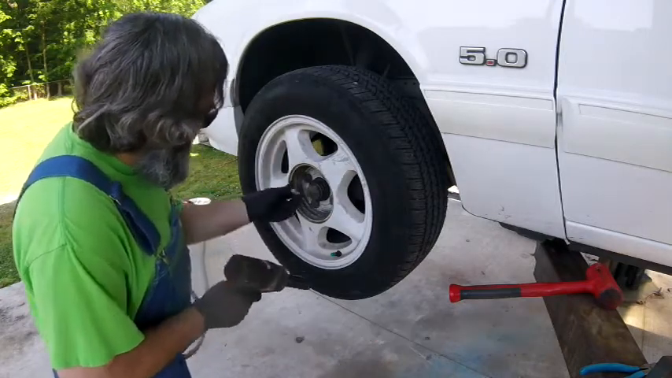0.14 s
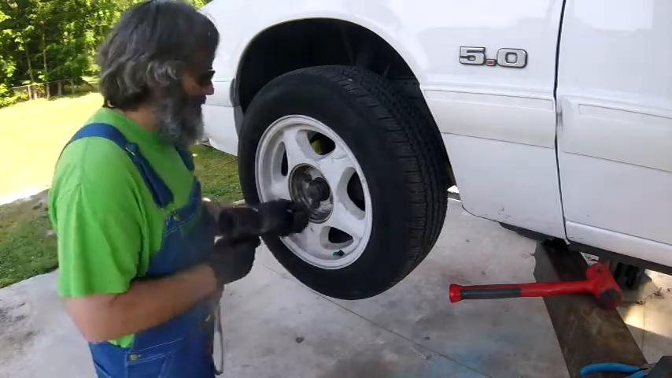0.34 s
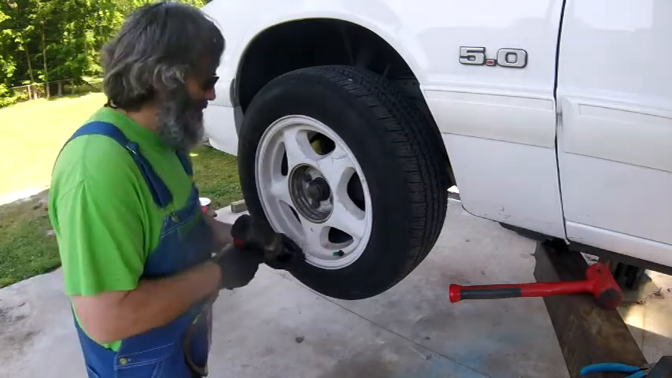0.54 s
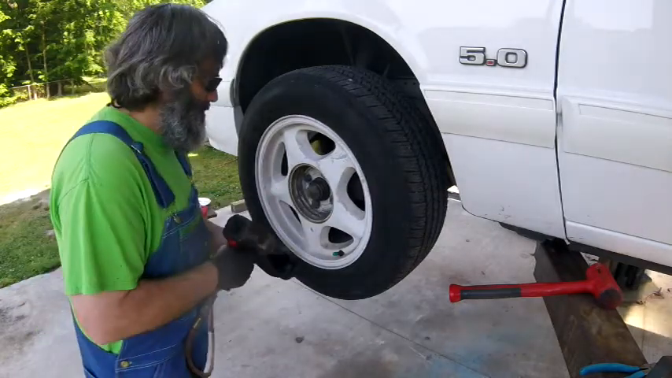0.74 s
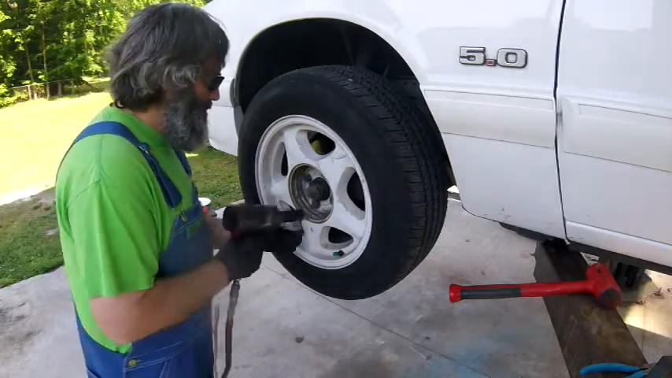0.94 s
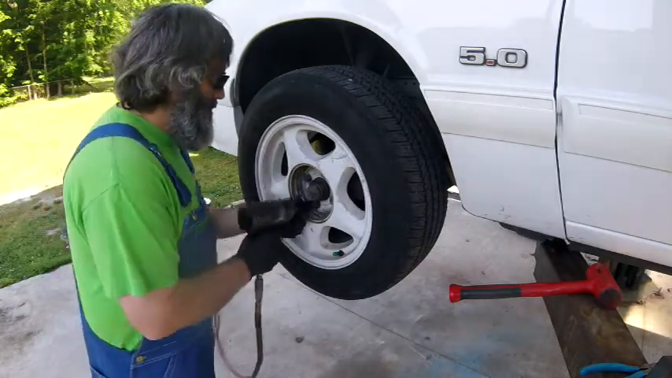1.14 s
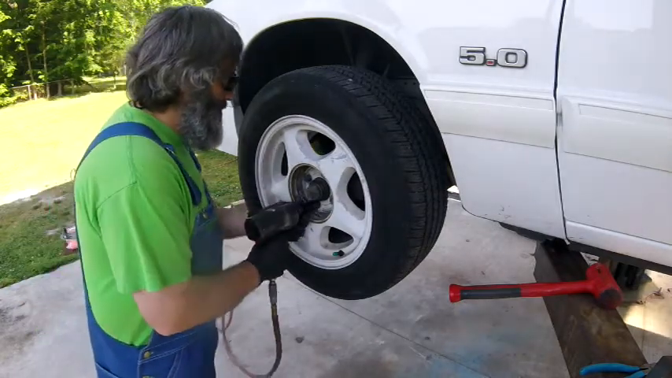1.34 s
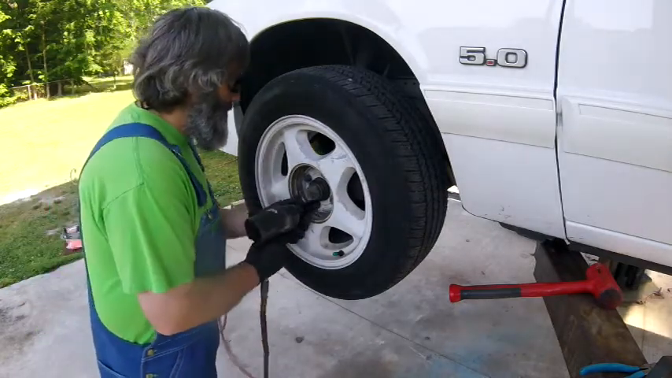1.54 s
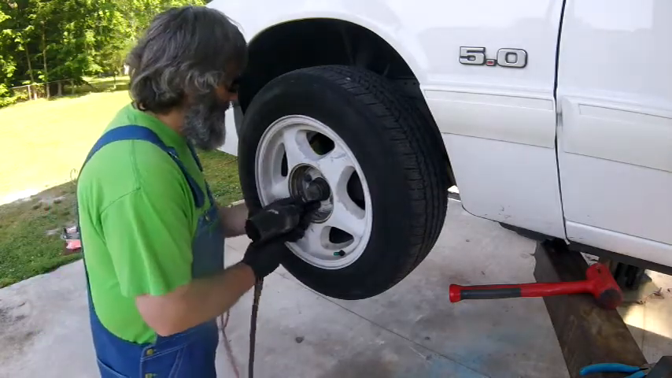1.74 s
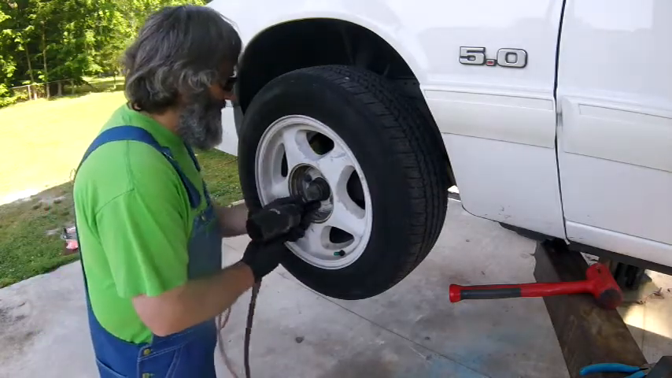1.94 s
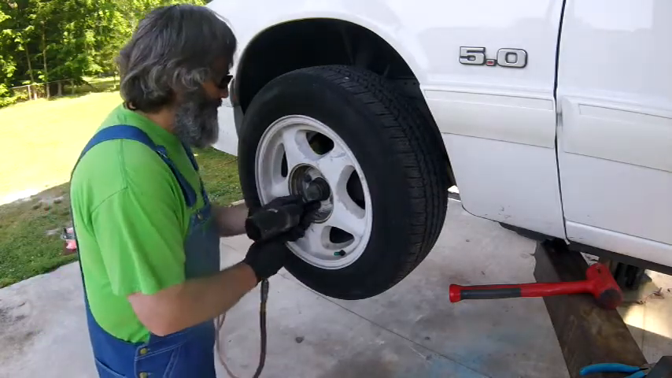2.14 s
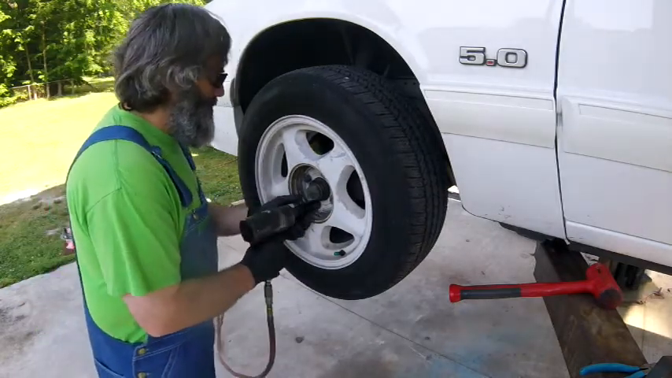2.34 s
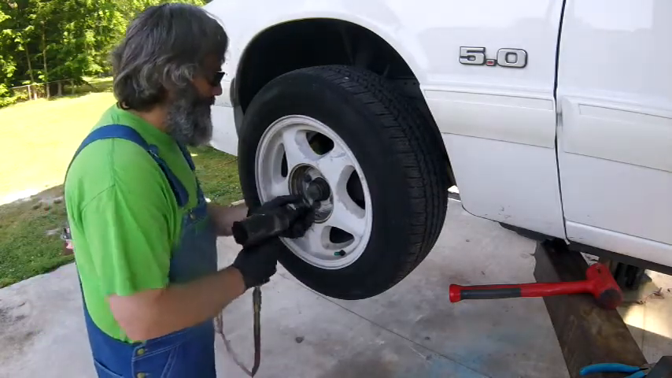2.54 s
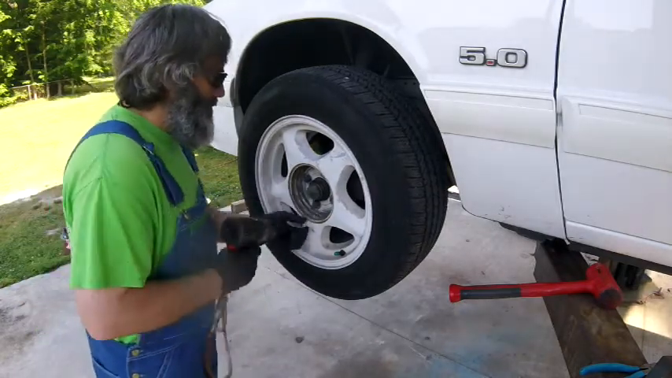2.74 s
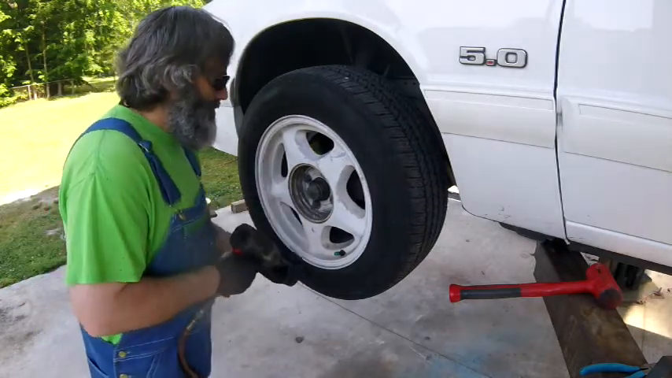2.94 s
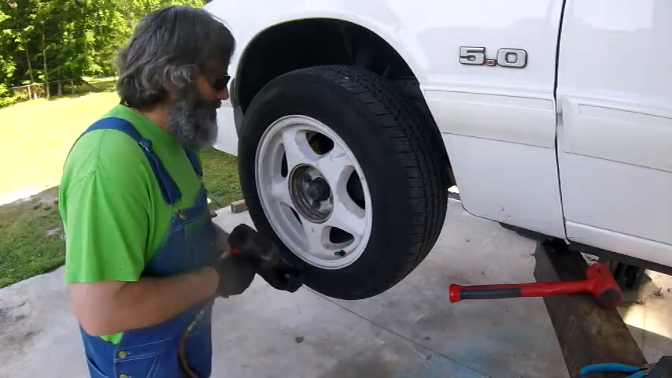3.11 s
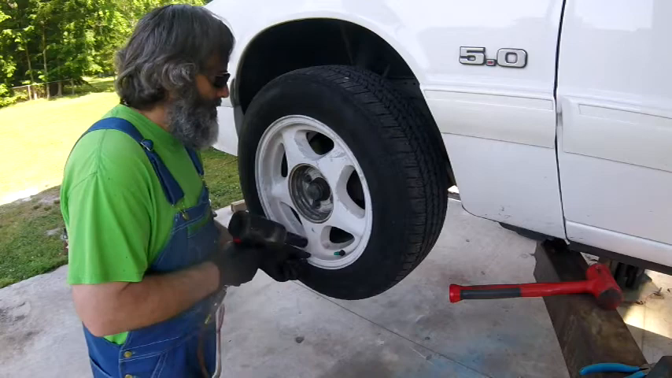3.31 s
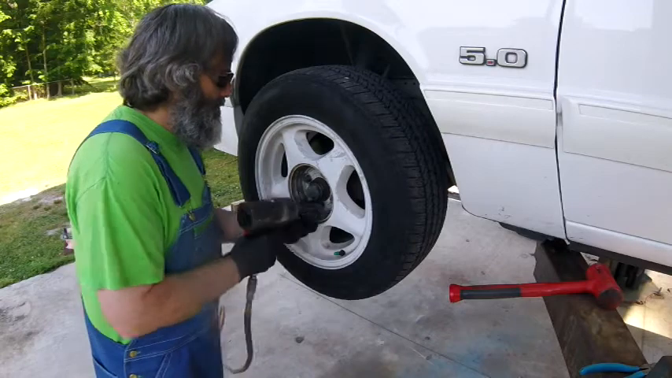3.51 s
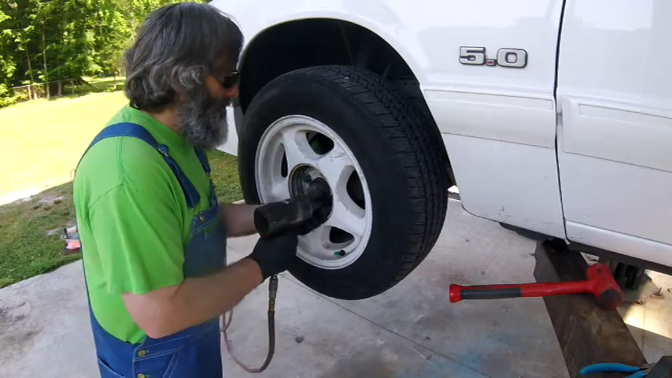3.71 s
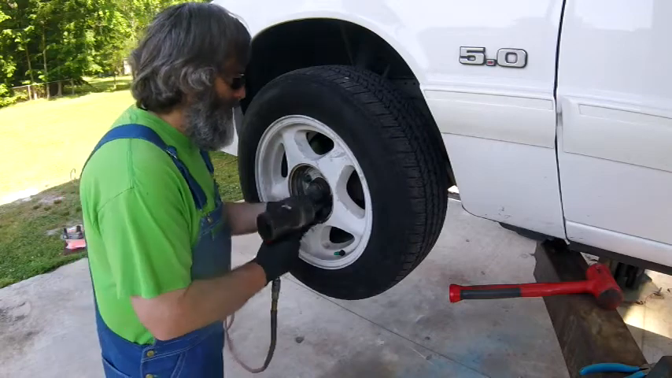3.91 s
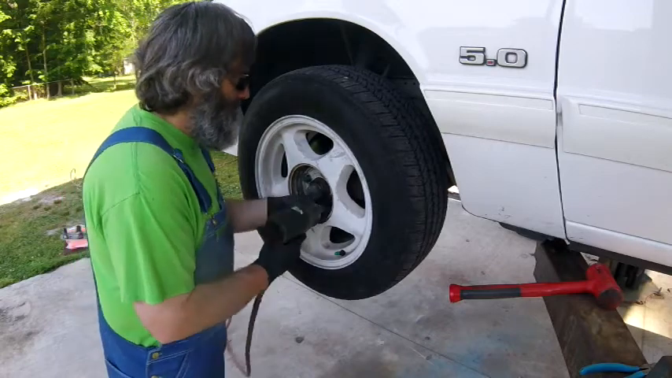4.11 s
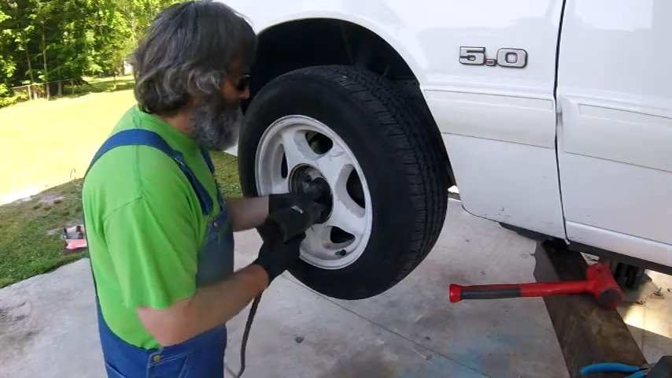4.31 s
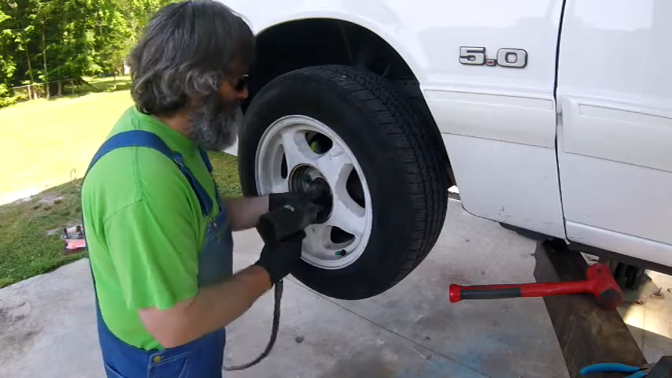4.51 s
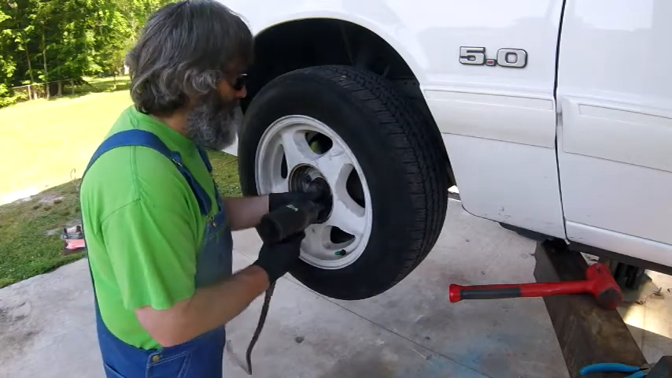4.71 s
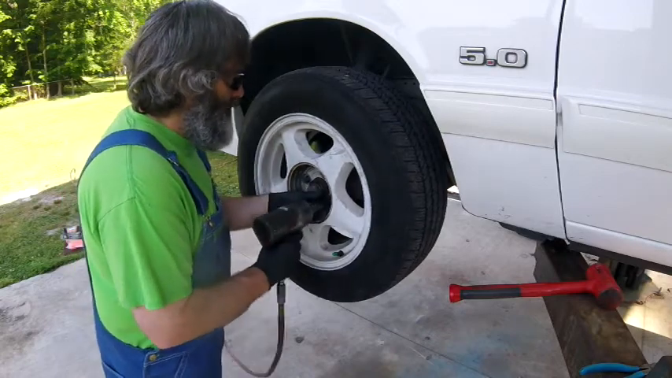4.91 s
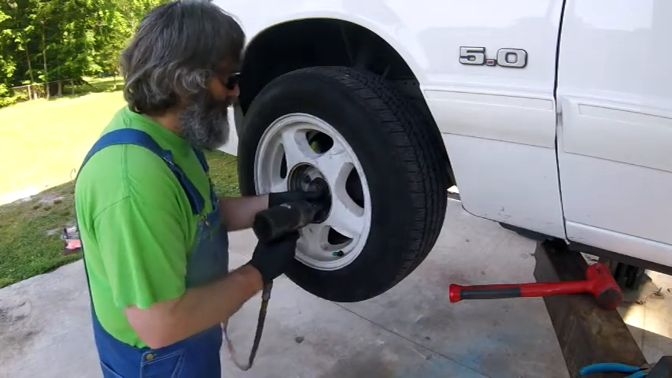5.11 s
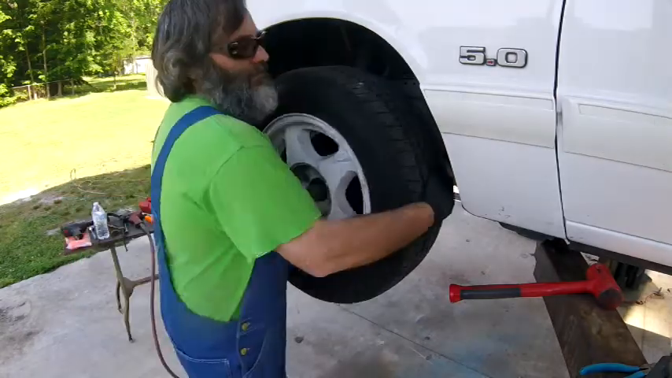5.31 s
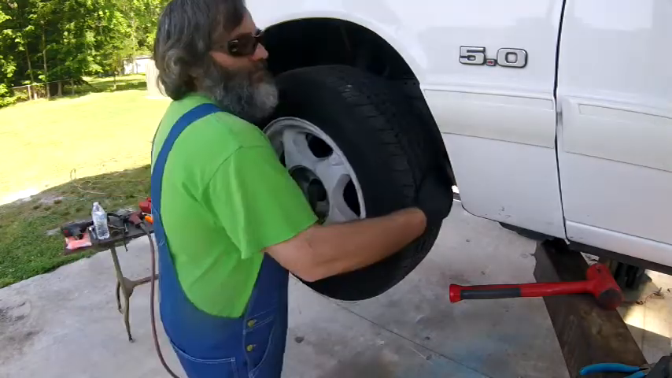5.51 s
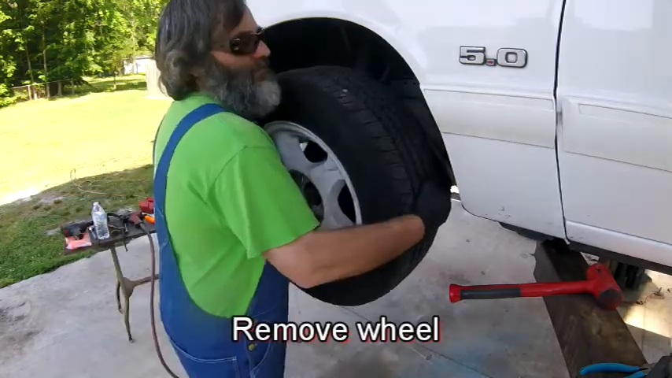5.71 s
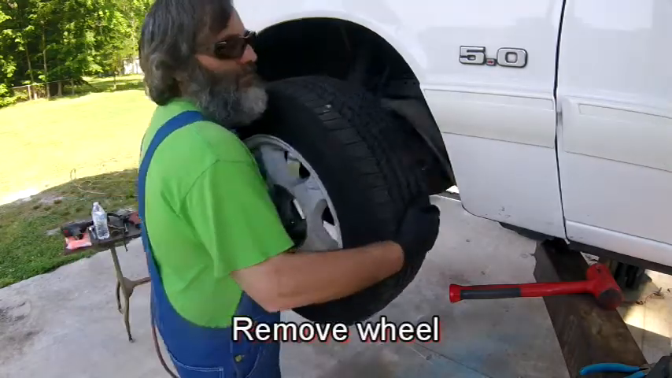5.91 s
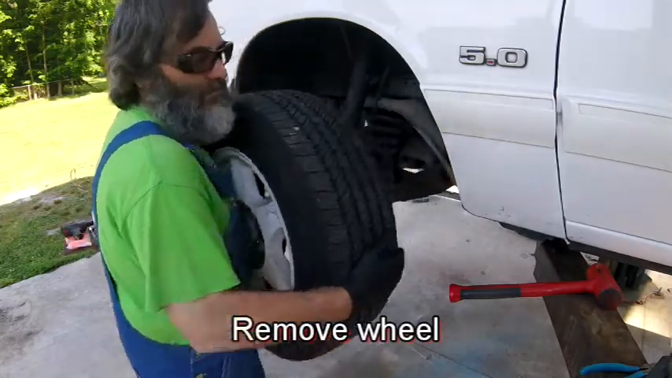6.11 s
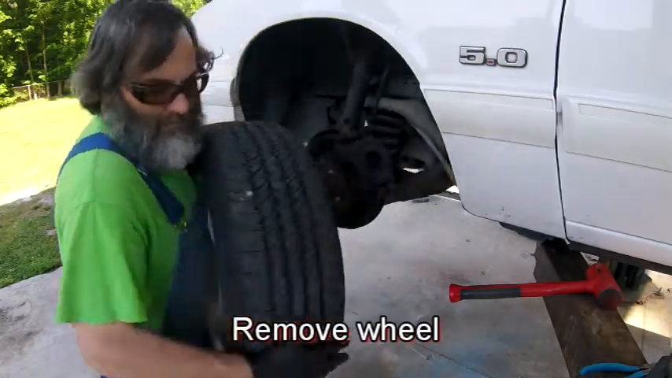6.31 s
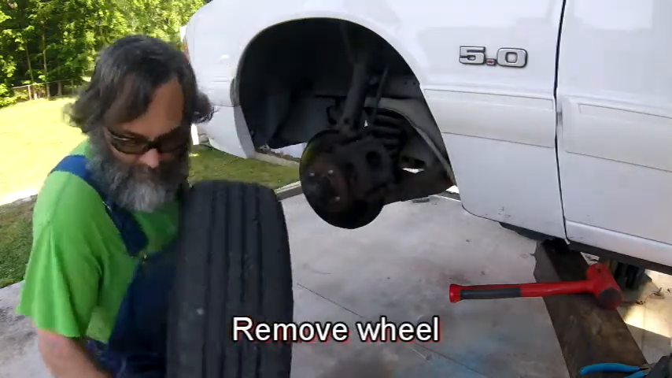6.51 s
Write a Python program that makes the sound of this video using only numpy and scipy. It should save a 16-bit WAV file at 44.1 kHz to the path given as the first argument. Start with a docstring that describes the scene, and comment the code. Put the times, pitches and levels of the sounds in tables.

```python
"""Air impact wrench on wheel nuts

Hammer blows ring socket and rim: clicks, dying noise and decaying steel modes. The vane motor whines up and coasts
down as partials on its pulse rate, growling under load; exhaust air hisses as coloured noise. The wheel is lifted
off with filtered-noise thumps and a grainy rubber scuff. Around it on the driveway: wind on the microphone and
an outdoor hush (noise), insects (a resonance), faint hums and songbirds (gliding sines)."""
import sys
import numpy as np
from scipy import signal
from scipy.fft import rfft, irfft
from scipy.io import wavfile
from scipy.ndimage import uniform_filter1d

SR = 44100
rng = np.random.default_rng(int(sys.argv[2]) if len(sys.argv) > 2 else 0)


def store_wav(level_fs):
    """Save 16-bit WAV to argv[1]."""
    pcm = np.round(np.clip(np.atleast_2d(level_fs), -1, 1) * 32767)
    wavfile.write(sys.argv[1], SR, pcm.T.astype(np.int16))


N = 288855

# Sharp steel contacts: hammer blows, socket on nut, loose socket ticking. Each row: start in seconds, level in dB.
HITS = [(0.5696, -39), (0.597, -40), (0.627, -40), (0.6809, -39), (0.7537, -38), (0.8354, -47),
        (0.9264, -37), (1.3104, -21), (1.3179, -20), (1.3473, -29), (1.3823, -28), (1.5768, -8),
        (1.6077, -7), (1.6492, -4), (1.6921, -2), (1.735, -4), (1.7784, -2), (1.8213, -5), (1.8647, -4),
        (1.9091, -18), (1.9844, -3), (2.0228, -3), (2.0652, -2), (2.2558, -18), (2.2672, -8), (2.2887, -6),
        (2.3436, -3), (2.3874, -12), (2.4628, -14), (2.6469, -16), (2.6544, -18), (2.6718, -20),
        (2.7102, -27), (2.7661, -28), (2.7935, -29), (2.8235, -29), (2.8584, -26), (2.9267, -27),
        (2.9442, -31), (2.9692, -33), (2.9806, -25), (3.0021, -34), (3.0245, -24), (3.0749, -31),
        (3.2166, -36), (3.3653, -39), (3.5473, -45), (3.7914, -23), (3.7993, -22), (3.8054, -21),
        (3.905, -37), (3.9674, -33), (4.0637, -24), (4.1324, -4), (4.1754, -2), (4.2173, -5), (4.2877, -7),
        (4.3505, -5), (4.3909, -2), (4.4328, -8), (4.4767, -4), (4.5161, -4), (4.572, -9), (4.6678, -26),
        (4.7471, -3), (4.79, -8), (4.817, -10), (4.9536, -29), (5.0774, -35), (5.1522, -35), (5.1921, -37),
        (5.2265, -34), (6.2744, -40), (6.4118, -27)]
# Motor running free, one list per spin. Each row: time in seconds, mean vane rate in pulses per second.
FREE_SPINS = [
    [(.328, 187), (.4, 166), (.47, 140), (.57, 114), (.64, 107), (.75, 72), (.95, 55)],
    [(2.245, 100), (2.265, 165), (2.325, 530), (2.375, 485), (2.42, 416), (2.5, 357), (2.7, 253),
     (2.9, 169), (3.1, 114), (3.35, 61)],
    [(4.712, 150), (4.73, 164), (4.79, 470), (4.82, 530), (4.9, 310), (4.955, 220), (5.0, 205), (5.12, 130),
     (5.32, 72)],
]
# Trigger pulls. Each row: press in seconds, release in seconds, air flow in dB at the press, at the release.
PULLS = [(1.555, 1.856, -27, -29.5), (1.95, 2.08, -23, -33.5), (2.231, 2.345, -30, -27.5),
         (4.079, 4.227, -25.5, -29.5), (4.319, 4.545, -30, -31.5), (4.704, 4.824, -31, -28.5)]

BLOW_DB = -10   # louder contacts choke the whine; against a held nut they are hammer blows
OPEN_S, SHUT_T60_S = 0.042, 0.28   # the valve opens, the housing empties
SURGE_S = 0.039   # length of a loaded growl
EDGE_SAMPLES = 130   # 3 ms smoothing


def from_db(db):
    """Decibels to gain."""
    return 10 ** (np.asarray(db) / 20)


def rms_one(x):
    """Scale to unit rms."""
    return x / np.sqrt(np.mean(x ** 2) + 1e-20)


def in_time(tables, column, outside):
    """One column of several tables on the sample grid, with a set value between the tables."""
    t, out = np.arange(N) / SR, np.full(N, float(outside))
    for rows in tables:
        rows = np.array(rows)
        inside = (t >= rows[0, 0]) & (t <= rows[-1, 0])
        out[inside] = np.interp(t[inside], rows[:, 0], rows[:, column])
    return out


def level(tables, column):
    """Gain curve, silent between the tables, with smoothed edges."""
    return uniform_filter1d(from_db(in_time(tables, column, outside=-140)), size=EDGE_SAMPLES)


def drift(rate_hz):
    """Random wander of unit rms: noise through a two-pole low-pass."""
    r = np.exp(-2 * np.pi * rate_hz / SR)
    wander = signal.lfilter([1], [1, -2 * r, r * r], rng.standard_normal(N + SR))
    return rms_one(wander[SR:])


def band(x, low_hz, high_hz):
    """Second-order Butterworth band-pass."""
    return signal.sosfilt(signal.butter(2, [low_hz, high_hz], "band", fs=SR, output="sos"), x)


def colour(x, spectrum):
    """Minimum-phase filter that follows a spectrum, so nothing sounds early."""
    hz, db = np.transpose(spectrum)
    grid_hz = np.linspace(0, SR / 2, 1025)
    log_gain = np.interp(np.log(grid_hz + 1), np.log(hz), db) * np.log(10) / 20
    cepstrum = irfft(log_gain)
    cepstrum[1:1024] *= 2   # fold to the causal side
    cepstrum[1025:] = 0
    impulse = irfft(np.exp(rfft(cepstrum)))
    return signal.fftconvolve(x, impulse)[:N]


def ring(clicks, hz, t60_s):
    """Two-pole resonator: a unit click sets a sine of initial height 1 ringing."""
    r, w = from_db(-60 / (t60_s * SR)), 2 * np.pi * hz / SR
    return signal.lfilter([0, np.sin(w)], [1, -2 * r * np.cos(w), r * r], clicks + 1e-18)


def dying(t60_s):
    """Envelope that falls 60 dB in t60_s."""
    return from_db(-60 * np.arange(int(t60_s * SR) + 1) / (t60_s * SR))


def noise_tail(t60_s):
    """Dying noise: the impulse response of scattered echoes, or a soft push."""
    envelope = dying(t60_s)
    return rng.standard_normal(len(envelope)) * envelope


def add(out, s, piece):
    """Mix a piece in at time s."""
    i = round(s * SR)
    out[i:i + len(piece)] += piece[:N - i]


def wind():
    """Lumpy wind on the microphone port, and a few heavier low bumps: low-band noise of wandering level."""
    # Each row: time in seconds, mean level in dB.
    gust_levels = [(0.0, -53), (0.2, -40), (0.42, -59), (1.09, -52), (2.41, -48), (2.55, -57), (3.3, -44),
                   (3.39, -50), (3.45, -48.5), (4.74, -50), (5.07, -45), (5.29, -58), (5.36, -39),
                   (5.73, -41), (5.93, -39.5), (6.02, -44.5), (6.51, -44), (6.55, -61)]
    gusts = rms_one(band(rng.standard_normal(N), 22, 95))
    return from_db(in_time([gust_levels], column=1, outside=-60) + 2 * drift(13)) * gusts


def hush_and_insects():
    """Coloured-noise hush with a narrow insect band: noise through a sharp resonance."""
    # Each row: time in seconds, mean hush level in dB.
    hush_levels = [(0, -59), (.33, -60), (1.2, -61.5), (5.325, -60), (5.335, -53), (6.55, -56)]
    # Far traffic and leaves. Each row: frequency in Hz, relative density in dB per Hz.
    hush_colour = [(76, -33.5), (130, -9), (230, -13), (400, -23.5), (700, -21), (1200, -23), (2400, -26),
                   (4000, -31.5), (5200, -33), (6500, -25.5), (9000, -32.5), (12000, -44), (13200, -42),
                   (15000, -82)]
    insect_hz, insect_width_hz, insect_db = 6540, 150, -11   # dB over hush
    hush = rms_one(colour(rng.standard_normal(N), hush_colour))
    insects = rms_one(ring(rng.standard_normal(N), insect_hz, 5.2 / insect_width_hz))
    gain = from_db(in_time([hush_levels], column=1, outside=-60) + 1.0 * drift(5.7))
    return gain * (hush + from_db(insect_db) * insects)


def hums():
    """Faint hums and lingering rings: sines wavering in pitch and level."""
    # One list per tone. Each row: time in seconds, mean pitch in Hz, relative level in dB.
    tones = [
        [(0, 546, -69), (.327, 548, -71)],
        [(3.81, 1180, -60), (4.0, 1180, -74)],
        [(5.8, 222, -50), (6.0, 222, -58), (6.35, 220, -65)],
    ]
    hz = in_time(tones, column=1, outside=360) * (1 + 0.0107 * drift(21.6))
    gain = level(tones, column=2) * from_db(6.5 + 2.0 * drift(42))
    return gain * np.sin(2 * np.pi * np.cumsum(hz) / SR)


def birds():
    """Songbirds: near sines with a smear of echoes from the trees."""
    # Each note: mean level in dB, then pitch points of time in seconds, mean pitch in Hz.
    notes = [(-56.5, [(1.235, 3100), (1.275, 3270), (1.29, 3200)]), (-48, [(1.34, 2990), (1.36, 2410),
             (1.41, 2210), (1.43, 2400), (1.45, 2800), (1.475, 2986)]), (-52, [(1.478, 2950), (1.495, 2550),
             (1.515, 2270), (1.55, 2170)]), (-65, [(5.495, 4200), (5.545, 4150), (5.6, 3890)]),
             (-59.5, [(5.86, 1740), (5.93, 1830), (5.96, 1930), (6.03, 1928)]), (-55, [(6.075, 2816),
             (6.13, 2865), (6.16, 3030), (6.187, 3340), (6.197, 3750)]), (-47, [(6.27, 2706), (6.288, 2640),
             (6.303, 3330)]), (-44.5, [(6.303, 2480), (6.34, 2584), (6.4, 2590), (6.425, 2900)]),
             (-44, [(6.428, 2520), (6.445, 2350), (6.49, 2334), (6.52, 2220), (6.53, 1945), (6.55, 1910)])]
    attack_s, release_s = .012, .007
    t, gain = np.arange(N) / SR, 0
    hz = in_time([pitch for _, pitch in notes], column=1, outside=2500) * (1 + .005 * drift(80))
    for db, pitch in notes:
        rise = (t - pitch[0][0]) / attack_s
        fall = (pitch[-1][0] - t) / release_s
        gain = gain + from_db(db) * np.clip(np.minimum(rise, fall), 0, 1)
    sine = np.sqrt(2) * np.sin(2 * np.pi * np.cumsum(hz) / SR)   # unit rms
    song = gain * from_db(1.4 * drift(30)) * sine
    return song + from_db(-35) * signal.fftconvolve(song, noise_tail(.5))[:N]


def scuff():
    """Rubber dragged on cloth: dense rubbing grains as noise of wandering level."""
    # Each row: time in seconds, level in dB.
    rub_levels = [(6.3, -52), (6.4, -49), (6.415, -39.5), (6.475, -30.5), (6.55, -43)]
    # Each row: frequency in Hz, relative density in dB per Hz.
    rub_colour = [(120, -32), (200, -16), (453, -5), (1410, -12), (2280, -7), (2780, -8.5), (6290, -5),
                  (10700, -28.5), (14000, -69)]
    grains = rng.standard_normal(N) * from_db(1.25 * drift(150))
    return level([rub_levels], column=1) * rms_one(colour(grains, rub_colour))


def thumps():
    """Dull knocks on tyre and rim: a dying burst of noise around one pitch, with a weaker overtone."""
    # Each row: start in seconds, peak of the body in dB, pitch in Hz, push t60 in seconds.
    knocks = [(1.312, -31, 724, 0.29), (1.319, -47, 470, 0.18), (1.385, -33.5, 440, 0.089),
              (3.325, -36, 114, 0.095), (3.365, -27, 57, 0.067), (3.458, -43, 86, 0.15),
              (3.797, -24.5, 644, 0.16), (3.811, -33.5, 164, 0.48), (4.062, -26.5, 490, 0.022),
              (4.718, -23, 210, 0.041), (5.33, -24.5, 208, 0.044), (5.341, -22.5, 226, 0.16),
              (5.363, -25.5, 160, 0.18), (5.788, -23, 127, 0.19), (5.865, -34, 63, .12)]
    out = np.zeros(N)
    for s, peak_db, hz, t60_s in knocks:
        push = noise_tail(t60_s)
        body = band(push, hz / 1.62, hz * 1.265)
        overtone = band(push, hz * 3.1, hz * 4.3)
        add(out, s, from_db(peak_db) * (body + 0.081 * overtone) / np.abs(body).max())
    return out


def flow():
    """Air through the tool: opens, drifts from start to end level, dies away after the trigger is let go."""
    t, out = np.arange(N) / SR, 0
    for press, go, start_db, end_db in PULLS:
        db = np.interp(t, [press, go], [start_db, end_db]) - 60 * np.maximum(t - go, 0) / SHUT_T60_S
        out = out + np.clip((t - press) / OPEN_S, 0, 1) * from_db(db)
    return out


def held(s):
    if any(rows[0][0] - OPEN_S <= s <= rows[-1][0] for rows in FREE_SPINS):
        return None
    for press, go, start_db, end_db in PULLS:
        if press <= s < go:
            return np.interp(s, [press, go], [start_db, end_db])
    return None


def by_speed(column):
    """Gain of one layer of the free motor: loudness follows speed, silent while it does not spin."""
    # Each row: vane rate in pulses per second, whine in dB, muffler breath in dB, hiss in dB.
    rows = np.array([(55.3, -120, -71, -70), (86.33, -71, -55.5, -61), (118, -50.5, -49, -57),
                     (187, -42, -45, -51), (300, -32, -39.5, -43.5), (465.8, -26, -32, -43.5)])
    rate_hz = in_time(FREE_SPINS, column=1, outside=1)
    gain = from_db(np.interp(np.log(rate_hz), np.log(rows[:, 0]), rows[:, column]))
    return uniform_filter1d(gain * (rate_hz > 1), size=EDGE_SAMPLES)


def per_spin(column):
    """One setting of each free spin, held over that spin on the sample grid."""
    # The last spin drags a nut. Each row: whine in dB, overtone tilt in dB per octave, level waver in dB,
    # pitch waver as a share.
    spins = [(1, -3.5, 1.6, .005), (0, -3.6, 2.4, .006), (-6, -6, 2.2, .02)]
    spans = [[(rows[0][0], spin[column]), (rows[-1][0], spin[column])] for rows, spin in zip(FREE_SPINS, spins)]
    return in_time(spans, column=1, outside=0)


def jolts():
    """Gain of the whine: a hard contact chokes it for a moment."""
    choke = np.zeros(N)
    for s, db in HITS:
        if db > BLOW_DB:
            add(choke, s, 0.48 * dying(0.097))
    return uniform_filter1d(np.clip(1 - choke, 0, 1), size=EDGE_SAMPLES)


def air(turns):
    """Exhaust hiss: coloured noise pulsing with the vanes and gritty with loose parts."""
    # Each row: frequency in Hz, relative density in dB per Hz.
    air_colour = [(760, -38.5), (1300, 4), (1740, -6.5), (2390, -1), (3170, -3), (3780, -6), (5990, 0.5),
                  (7140, -10.5), (8110, -6.5), (10300, -16), (11200, -26.5), (13500, -65.5)]
    grit = (rng.random(N) < 900 / SR) * rng.exponential(1, N) * rng.choice([-1, 1], N)   # 900 per s on average
    pulsing = 1 + 0.11 * np.cos(2 * np.pi * turns)
    jet = rng.standard_normal(N) * pulsing + 2.0 * grit
    gain = (flow() + by_speed(column=3)) * from_db(3.34 * drift(100))
    return gain * rms_one(colour(jet, air_colour))


def vanes(rate_hz, tilt_db, overtone_db):
    """Vanes passing the port: a stack of partials on the pulse rate, and the pulse count."""
    # Gain of whine partials. Each row: frequency in Hz, gain in dB before tilt.
    vane_tone = [(60, -12), (150, -1), (260, 1), (480, 0), (650, -8), (800, -3), (920, -5), (1100, 5),
                 (1250, 0), (1400, -6), (1600, -4), (2000, -7), (2600, -14)]
    turns = np.cumsum(rate_hz / SR)
    hz, db = np.transpose(vane_tone)
    out = 0
    for k in range(1, 11):
        gain_db = np.interp(np.log(k * rate_hz), np.log(hz), db) + tilt_db * np.log2(k)
        # a time-varying overtone_db is shifted per overtone, so each wavers on its own
        gain_db = gain_db + np.sqrt(k - 1) * np.roll(overtone_db, 3001 * k)
        out = out + from_db(gain_db) * np.sin(2 * np.pi * k * turns)
    return out, turns


def free_spin():
    """Clean whine plus puffs of air ringing the muffler; also the pulse count."""
    # Muffler resonances. Each row: frequency in Hz, width in Hz, relative level in dB.
    muffler = [(784, 16, 9), (1033.5, 48, 11.5), (1126, 250, 11.5), (1380, 630, 12), (1940, 170, 0)]
    driven_db = 4.5   # whine added while the rotor speeds up, dB over air flow
    rate_hz = in_time(FREE_SPINS, column=1, outside=100)
    climbing = uniform_filter1d(1. * (np.gradient(rate_hz) > 0), size=900)
    wavering_hz = rate_hz * (1 + per_spin(column=3) * drift(40))
    tilt_db = per_spin(column=1) - 5 * climbing   # overtones come out once the climb ends
    whine, turns = vanes(wavering_hz, tilt_db, per_spin(column=2) * drift(15))
    puffs = (1.0 + np.exp(-3.0 * (turns % 1))) * rng.standard_normal(N)
    breath = sum(from_db(db) * np.sqrt(width_hz) * ring(puffs, hz, 5.2 / width_hz)
                 for hz, width_hz, db in muffler)
    whine_gain = by_speed(column=1) + from_db(driven_db) * climbing * flow()
    whine_gain = from_db(per_spin(column=0)) * whine_gain * jolts()
    return whine_gain * whine + by_speed(column=2) * rms_one(breath), turns


def growls(surges):
    """Rotor under load: short rough rising stacks of vane partials with a low noise rumble."""
    stall_hz, climb_hz_per_s = 141.2, 6660   # means, varied by chance per surge
    out = np.zeros(N)
    age_s = np.arange(int(SURGE_S * SR)) / SR
    shape = np.minimum(age_s / 0.0028, 1) * np.minimum((SURGE_S - age_s) / 0.022, 1)
    chance = rng.standard_normal((len(surges), 2))
    rough = drift(85)   # uneven puffs
    rumble = rms_one(band(rng.standard_normal(N), 120, 600))
    for (s, surge_db), (start, climb) in zip(surges, chance):
        first = round(s * SR)
        here = slice(first, first + len(age_s))
        climb_hz = stall_hz * (1 + 0.082 * start) + climb_hz_per_s * (1 + 0.47 * climb) * age_s
        growl, _ = vanes(climb_hz * (1 + 0.071 * rough[here]), tilt_db=-9.0, overtone_db=-5.5)
        out[here] += from_db(surge_db + 1.0 * rough[here]) * shape * (growl + 0.68 * rumble[here])
    return out


def hammering():
    """Rattles and rotor surges that go with the presses and the blows, as (s, level dB)."""
    # Loud clutch rattles besides the regular ones. Each row: time in seconds, level in dB.
    extra_rattles = [(1.633, -6.5), (2.318, -6.5), (2.404, -17.5), (2.527, -15), (4.100, -6), (4.114, -9.5),
                     (4.334, -12), (4.457, -15), (4.733, -9)]
    # Hard first surges on a tight nut. Each row: start in seconds, level in dB.
    lunges = [(1.583, -20), (4.102, -22.5)]
    press_lag_s, open_rattle_db = 0.0094, -0.5   # first rattle after the press; dB over air flow
    dog_lead_s, dog_db, dog_spread_db = .016, 15.5, 3   # clutch dogs rattle ahead of each blow; dB over air flow
    restart_s, surge_db = .018, -1   # the stalled rotor climbs again after each blow; dB over air flow

    blows = [s for s, db in HITS if db > BLOW_DB and held(s) is not None]
    luck = rng.standard_normal((len(blows), 2))
    rattles = extra_rattles + [(s + press_lag_s, db + open_rattle_db) for s, _, db, _ in PULLS]
    starts = [s for s, *_ in PULLS]
    for s, (loud, late) in zip(blows, luck):
        rattles.append((s - dog_lead_s, held(s) + dog_db + dog_spread_db * loud))
        starts.append(s + restart_s + 0.00203 * late)

    surges = list(lunges)
    for s in starts:
        in_lunge = any(0 <= s - lunge < SURGE_S for lunge, _ in lunges)
        if held(s + SURGE_S / 4) is not None and not in_lunge:
            surges.append((s, held(s) + surge_db))
    return rattles, surges


def hits(rattles):
    """A hit is a sharp click, a dying spray of noise and the steel modes; a rattle is spray that swells first."""
    # Socket and rim modes. Each row: frequency in Hz, relative level in dB, t60 in seconds.
    steel = [(1486, -16.5, 0.067), (2180, -20.5, 0.021), (3167, -5.5, 0.0149), (4260, -20.5, 0.065),
             (4800, -13, .05), (4860, -27, 0.024), (5950, -9, 0.03), (6390, -40.5, .08), (6670, -11, 0.11),
             (6509, -21.5, 0.017), (8470, -2.5, 0.038), (9200, -15, .05)]
    # Spray of a hit. Each row: frequency in Hz, relative density in dB per Hz.
    crack = [(180, -22.5), (300, -3.5), (863, -8.5), (1280, -7.5), (1990, -5), (2440, -3), (4240, -6),
             (4740, -3), (6000, 2), (7140, -9.5), (10300, -18), (13000, -55.5)]
    rows = np.array(HITS)
    at = np.round(rows[:, 0] * SR).astype(int)
    spray, clicks = np.zeros((2, N))
    for s, hit_db in HITS:
        add(spray, s, from_db(hit_db) * dying(0.012))
        add(spray, s, from_db(hit_db - 2.5) * dying(0.083))   # rim and hub buzz on
    age = np.arange(SR // 10) / (0.0026 * SR)   # in swell times of 2.6 ms
    for s, rattle_db in rattles:
        add(spray, s, from_db(rattle_db + 9.5) * age * np.exp(-age))
    clicks[at] = from_db(rows[:, 1])
    noise = rng.standard_normal(N) * from_db(0.91 * drift(520))
    unit = np.std(colour(noise, crack))
    out = colour(from_db(-9.5) * spray * noise + from_db(4.5) * clicks, crack) / unit
    strengths_db = rng.normal(0, 3, (len(HITS), len(steel)))   # each hit excites the modes differently
    for k, (hz, db, t60_s) in enumerate(steel):
        clicks[at] = from_db(rows[:, 1] + db - 19 + strengths_db[:, k])
        out += ring(clicks, hz, t60_s)
    return out


def scene():
    """Surroundings and wheel, motor, and steel and air that scatter off car body and concrete."""
    around = wind() + hush_and_insects() + hums() + birds()
    wheel = scuff() + thumps()
    rattles, surges = hammering()
    spin, turns = free_spin()
    motor = spin + growls(surges)
    tool = hits(rattles) + air(turns)
    tool = tool + from_db(-38) * signal.fftconvolve(tool, noise_tail(.22))[:N]
    return (around + wheel + motor + tool)[None]


def record(dry):
    """Peaks are rounded by tanh, the top is cut by a steep low-pass."""
    rounded = 0.88 * np.tanh(dry / 1.121)
    low_pass = signal.cheby2(12, 70, 15480, fs=SR, output="sos")   # 70 dB down from 15480 Hz up
    return signal.sosfilt(low_pass, rounded)


dry = scene()
out = record(dry)
store_wav(out)
```